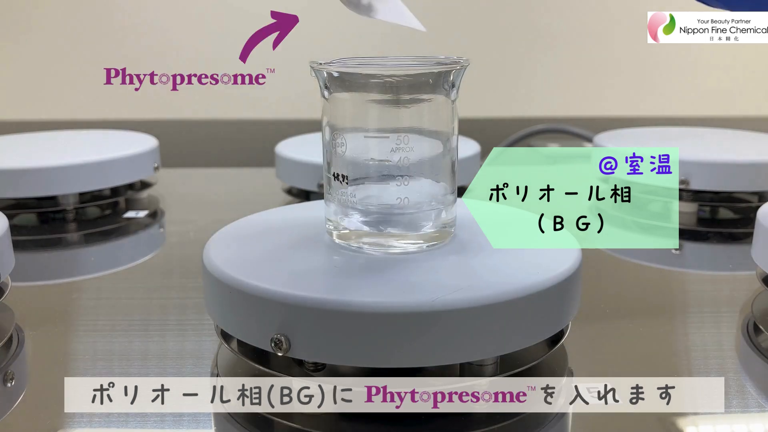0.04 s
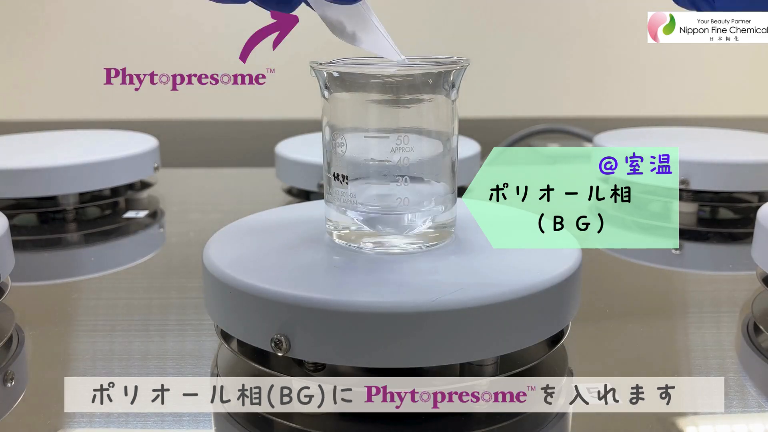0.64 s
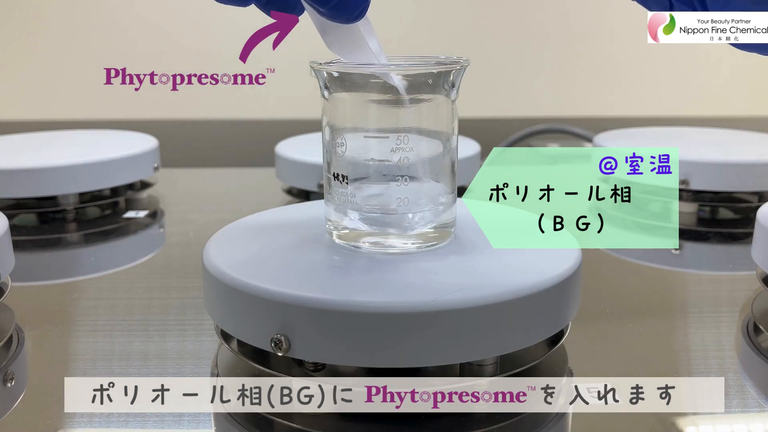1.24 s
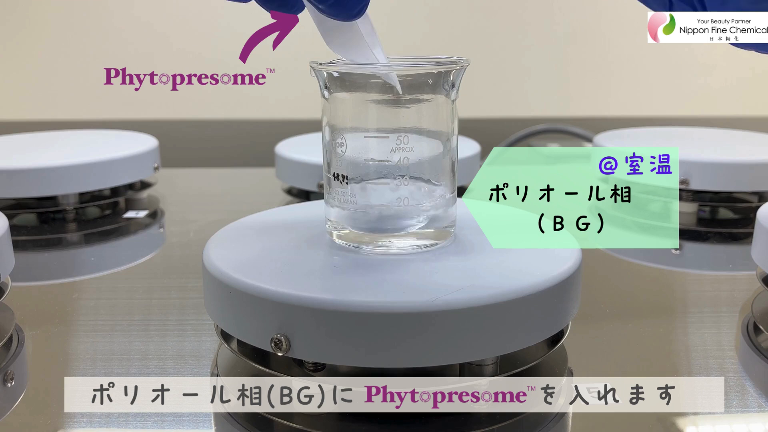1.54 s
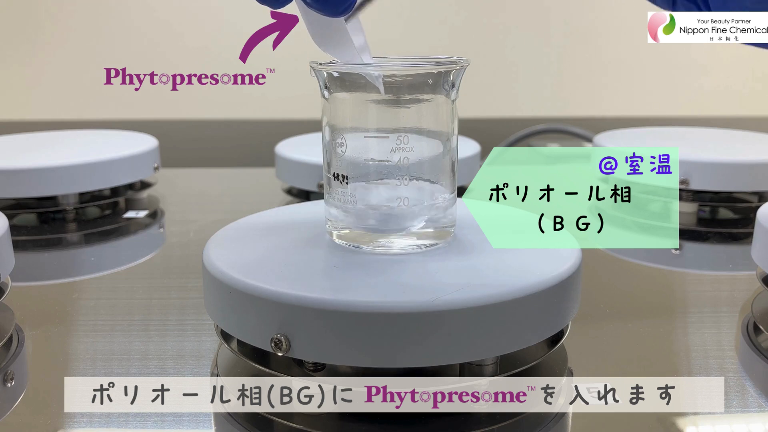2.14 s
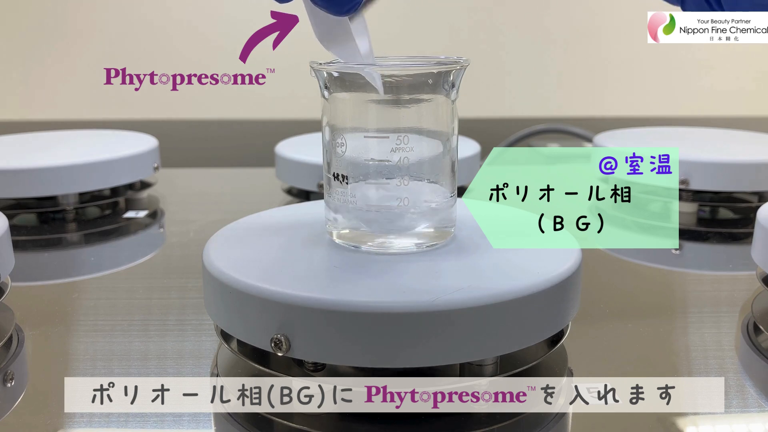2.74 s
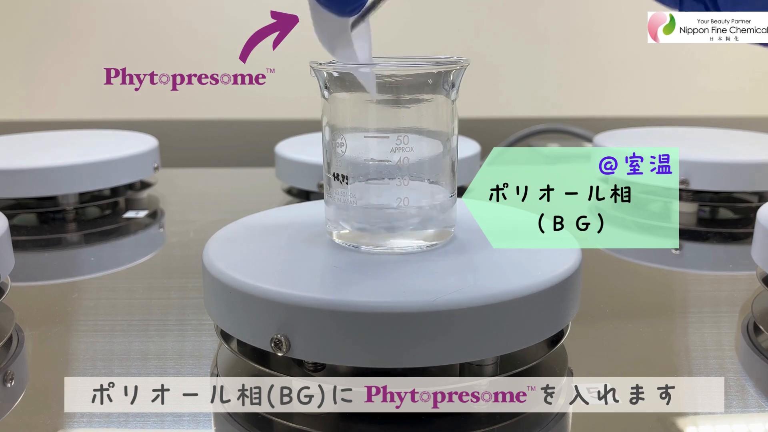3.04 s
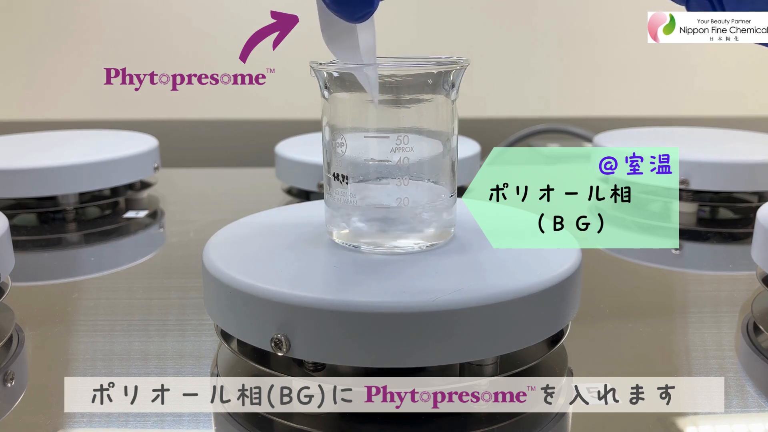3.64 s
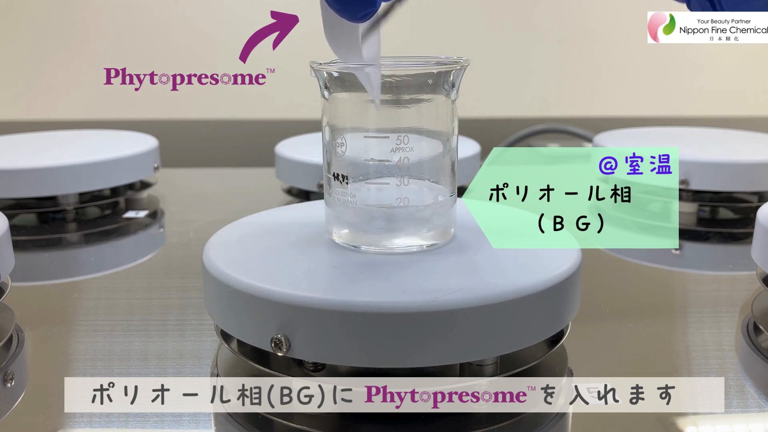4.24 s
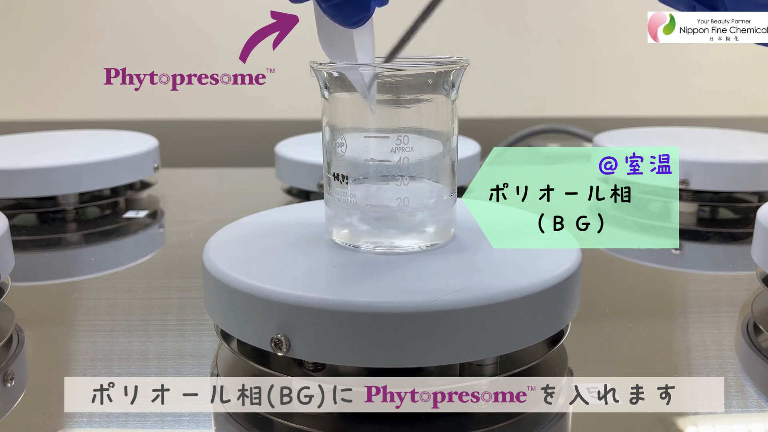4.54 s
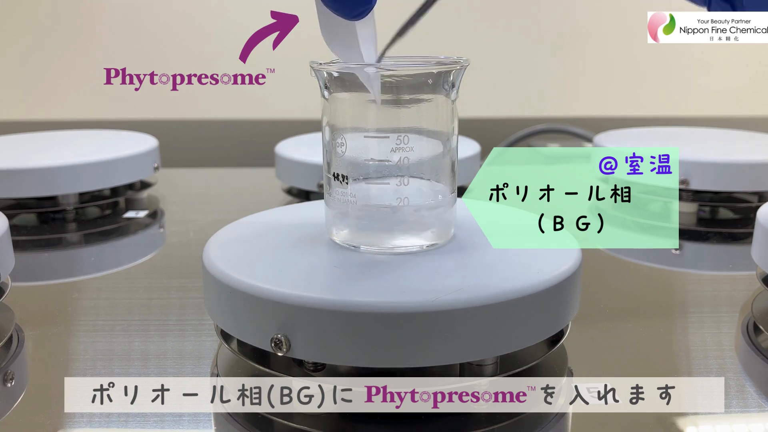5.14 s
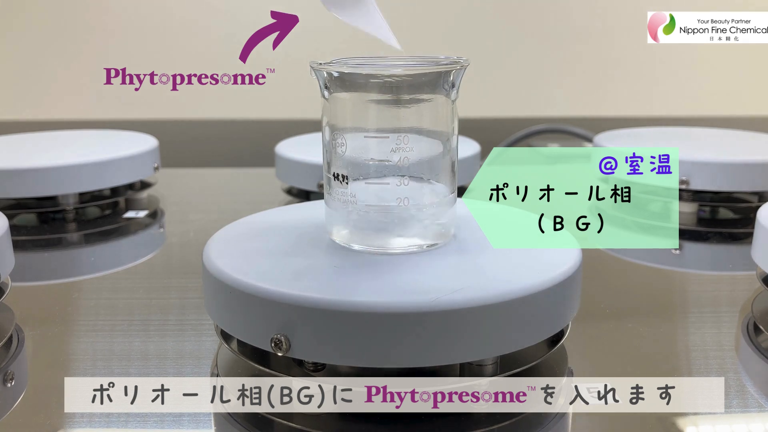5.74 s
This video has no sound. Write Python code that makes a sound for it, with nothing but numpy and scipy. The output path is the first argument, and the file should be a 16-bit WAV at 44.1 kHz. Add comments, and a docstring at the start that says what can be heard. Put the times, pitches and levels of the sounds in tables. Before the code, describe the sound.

Laboratory ventilation and motors hum low and steadily throughout. Close by and slightly to the left, a folded sheet of paper rustles and crinkles faintly, with one sharp dry click early on. From about halfway, a steel spatula lightly taps the paper several times, many taps joined by a quick, slightly squeaky scrape. Near the end the paper slides away in a soft, brightening swish with one last tap.

```python
"""Tipping powder from a folded weighing paper into a beaker, over a bed of laboratory ventilation.
First the paper rustles and crinkles as it shifts and flexes in a gloved hand; a dry click falls at 1.3 s.
From 2.8 s a steel spatula taps the sheet, knocking the stiff fold and pinging the blade. From 3.4 s it
also scrapes the paper clean in quick strokes, a friction rasp with a juddering squeak from the fold.
At 5.4 s the paper is drawn away in a brightening swish, with one last tap. Ducts and motors drone on."""
import sys
import numpy as np
from scipy import signal
from scipy.fft import rfft, irfft, next_fast_len
from scipy.io import wavfile
from scipy.ndimage import uniform_filter1d, map_coordinates

SR = 44100
rng = np.random.default_rng(int(sys.argv[2]) if len(sys.argv) > 2 else 0)


def log_audio(samples):
    """Write samples as a 16-bit WAV file to the path given in sys.argv[1]."""
    # one column per channel
    frames = np.atleast_2d(samples).T
    # limit to full scale, then quantise
    limited = np.clip(frames, -1, 1)
    pcm = np.round(limited * 32767).astype(np.int16)
    wavfile.write(sys.argv[1], SR, pcm)


N = 255780

# the paper shifts in the glove: (middle [s], length [s], rustle [dB], sheen over rustle [dB])
PAPER_MOVES = [(.01, 0.074, -80, -6), (0.257, 0.2, -79.5, -2), (0.466, 0.14, -82, 11),
               (0.65, 0.084, -72, 3.5), (.815, 0.053, -78, 3.5), (.96, 0.14, -85, 9.5),
               (1.049, 0.072, -73, 2.5), (1.14, 0.031, -74.5, -2), (1.478, 0.023, -77, -9),
               (1.54, 0.068, -75, -2), (1.757, 0.04, -80, 1.5), (1.89, 0.069, -78.5, 7),
               (2.095, 0.028, -78, -9), (2.217, 0.083, -81, 4.5), (2.402, 0.039, -78, -17),
               (2.803, 0.047, -78, 5.5), (3.08, 0.11, -76, -2), (3.338, 0.088, -81, -3),
               (3.48, 0.063, -79.5, 7), (4.15, 0.031, -82.5, 3), (4.417, 0.028, -89, 12),
               (5.306, 0.05, -76.5, 3), (5.377, 0.069, -70.5, -0.5), (5.62, .03, -78, 9),
               (5.71, .04, -75, 11)]
# the sheet flexes: (time [s], nominal length [s], level [dB])
CRINKLE_CUES = [(0.266, .008, -70), (0.486, .014, -73.5), (0.52, .012, -77), (1.543, 0.019, -61.5),
                (1.583, 0.037, -69.5), (1.847, 0.036, -66), (2.167, 0.057, -76.5), (2.467, 0.058, -73),
                (2.778, 0.0036, -60), (3.048, 0.0092, -68), (3.257, 0.021, -67.5), (3.445, 0.0085, -63.5),
                (3.701, .005, -65), (3.725, 0.015, -54), (3.996, 0.0076, -64), (4.218, 0.018, -73)]
# the spatula lands: (time [s], knock [dB], pitch [Hz], blade ping [dB])
TAP_CUES = [(2.7794, -64, 1500, -56), (3.045, -48.5, 1270, -72), (3.259, -53, 1240, -71),
            (3.7012, -49.5, 1200, -60), (3.9914, -45, 1330, -70), (4.218, -57, 1110, -70),
            (4.7294, -45, 1250, -72), (4.998, -46, 1240, -59), (5.69, -52.5, 1010, -72)]
# the spatula runs down the fold: (time [s], nominal length [s], rasp [dB], squeak middle [s],
# squeak length [s], squeak [dB], pitch [Hz], glide [Hz/s])
SCRAPE_CUES = [(3.448, 0.057, -72, 3.47, .04, -72.5, 1350, 1000),
               (3.73, 0.028, -55.5, 3.752, .014, -54, 1380, 8000),
               (3.997, 0.043, -57.5, 4.018, .03, -55.5, 1365, 3800),
               (4.24, 0.067, -75.5, 4.27, 0.038, -73.5, 1410, 2000),
               (4.503, 0.046, -58, 4.528, .036, -57, 1407, 2000),
               (4.738, 0.042, -57, 4.765, 0.03, -56, 1446, 4800),
               (5.003, 0.058, -57.5, 5.038, 0.037, -55.5, 1495, 4200)]
# modes of the steel blade: (frequency [Hz], level [dB], t60 [s])
BLADE_MODES = [(10090, -6, .03), (11000, -6, 0.032)]
# resonances of the folded sheet, and of the ducts and cabinet: (centre [Hz], half width [Hz], lift [dB])
SHEET_RESONANCES = [(2470, 190, 11), (3330, 320, 10), (4270, 190, 7.5), (5330, 230, 10), (6740, 920, 4.5),
                    (7980, 340, 5.5), (9650, 210, 9), (10700, 220, 5.5), (13000, 450, 5), (14900, 400, 9.5)]
DUCT_RESONANCES = [(75.8, 5.24, 8), (155.9, 14, 8), (177.3, 10, 8), (211, 11.5, 13.5), (283, 25, 6),
                   (341.5, 12.2, 8), (374, 16.8, 6.5), (415.4, 11, 8), (476.4, 22.2, 9), (518, 13, 4.5),
                   (599.5, 11.6, 8.5), (635, 9.6, 8.5), (672, 21, 6.5), (794.4, 21, 8.5), (864, 12, 9)]
# tone colour of each noise layer: (frequency [Hz], relative level [dB])
RUSTLE_EQ = [(500, -11), (1300, -5.5), (2400, -1.5), (3400, 2), (4100, -2), (4900, -6.5), (8000, -3),
             (11000, -37)]  # body of the sliding paper
SHEEN_EQ = [(3000, -8.5), (7000, -13), (9700, 3), (10800, 4.5), (12300, 0), (14700, 0), (16000, -12)]  # its airy top
CRINKLE_EQ = [(900, -30), (1900, -7), (4200, -25), (6000, -10.5), (8000, -5), (9800, -3), (13000, -7),
              (16000, -4)]  # flexing sheet
SCRAPE_EQ = [(900, -40), (1900, -2), (3800, -10), (5300, -5), (7800, 1), (10000, -1.5), (12000, -3.5),
             (15000, -5), (16000, -22)]  # blade rubbing on paper
CRACK_EQ = [(600, 7), (1400, 2), (2100, -3), (2900, -14), (5000, -18), (16000, -24)]  # attack of a tap
AIR_EQ = [(18.0, -17), (28.0, -23), (45.0, 0), (110.0, 0.5), (240.0, -5.5), (400.0, -13), (560.0, -19),
          (750.0, -25.5), (950.0, -30), (1300.0, -39), (2000.0, -47.5), (4500.0, -52), (16000.0, -55.5)]  # air in the ducts
HISS_EQ = [(4500, -47), (6100, -10.5), (6900, 5), (7300, -3), (8200, -8), (9500, -30), (16000, -18)]  # thin background hiss
# stereo width of the air: (frequency [Hz], side over mid [dB])
AIR_WIDTH = [(60, -21.5), (120, -13), (240, -16), (480, 0), (950, 2), (1890, 1), (3770, 0.5), (7520, 0.5),
             (15000, -66)]
# balance of the air: (frequency [Hz], left over right [dB])
AIR_PAN = [(180, -0.5), (330, -2.5), (520, 3.0), (1200, 2.5), (2500, 1.0)]
# the draught's boom swells: (middle [s], length [s], lift [dB])
BOOM_SWELLS = [(.08, 0.22, 3.5), (1.12, 0.067, 2), (1.32, 0.13, 3.5), (2.067, 0.093, 3), (2.778, 0.17, 4.5),
               (3.722, 0.13, 2.5), (4.7, 0.14, 2.5), (5.68, .08, 1.5)]
# motor tones: (frequency [Hz], left level [dB], right level [dB])
MOTOR_TONES = [(116, -77, -78), (209.6, -57, -56.5), (408.5, -71.5, -70.5), (477, -69, -72.5),
               (716, -85, -86), (841, -82, -81)]
# decay of the room: (frequency [Hz], t60 [s])
ROOM_DECAY = [(200, 0.28), (1500, 0.25), (8000, 0.17), (16000, 0.043)]

TIME = np.arange(N) / SR
SIDES = np.array([[.5], [-.5]])  # splits a stereo offset between left and right


def paper_rustle(held_db=-88, held_sheen_db=-0.5, fidget_db=0.7):
    """Paper slides in an unsteady hand: a soft rustle with a sheen on top, never quite still."""
    moves = [amp([[db], [db + sheen_db]]) * swell(middle, length)
             for middle, length, db, sheen_db in PAPER_MOVES]
    held = amp([[held_db], [held_db + held_sheen_db]])
    rustle_gain, sheen_gain = np.sqrt(sum(gain ** 2 for gain in moves + [held, pull_away()]))
    rustle = rustle_gain * friction(RUSTLE_EQ, grain_db=0.5, clump_db=-1.5, flex_db=6.0)
    sheen = sheen_gain * friction(SHEEN_EQ, grain_db=0.5, clump_db=1.5, flex_db=-2.0)
    return (rustle + amp(-4) * sheen) * amp(fidget_db * wobble(45))


def pull_away(start=5.446, onset_s=0.036, speedup_s=0.41, grow_db_per_s=24, brighten_db_per_s=50):
    """Rustle and sheen gains for the exit: louder and brighter until the hand is at full speed."""
    t = np.minimum(TIME - start, speedup_s)
    rustle = np.clip(t / onset_s + .5, 0, 1) * amp(-74.5 + grow_db_per_s * t)
    return np.array([rustle, rustle * amp(-5.5 + brighten_db_per_s * t)])


def paper_crinkles(trim_db=3):
    """Short bright bursts as the sheet flexes."""
    pressure = sum(amp(db + trim_db) * stroke(start, length * 0.69, rise=length * 1.26, fall=.006)
                   for start, length, db in CRINKLE_CUES)
    return pressure * friction(CRINKLE_EQ, grain_db=4.5, clump_db=-0.2, flex_db=9.5)


def spatula_taps(rise_s=0.0013, thud_hz=850, rebound_s=0.0075, crack_t60=0.0088, shiver_t60=0.075):
    """Each landing cracks, knocks the stiff fold and rebounds once; the blade pings, the sheet shivers."""
    tracks = np.zeros((2, N + SR))
    t = np.arange(SR // 10) / SR
    for start, db, hz, ping_db in TAP_CUES:
        knock = np.sin(2 * np.pi * hz * t) + amp(-5) * np.sin(2 * np.pi * thud_hz * t)
        knock *= (t / rise_s * np.exp(1 - t / rise_s)) ** 2
        knock += amp(-13) * np.interp(t - rebound_s, t, knock)
        ping = sum(amp(ping_db + level - 60 * t / t60) * np.sin(2 * np.pi * mode_hz * t)
                   for mode_hz, level, t60 in BLADE_MODES)
        crack = amp(-9 - 60 * t / crack_t60)
        shiver = amp(-31 - 60 * t / shiver_t60)
        at = round(start * SR)
        tracks[:, at:at + len(t)] += [amp(db) * knock + ping, amp(db) * (crack + shiver)]
    tones, noise_gain = tracks[:, :N]
    return tones + noise_gain * unit_rms(equalise(rng.standard_normal(N), CRACK_EQ))


def spatula_scrapes(trim_db=2, easing_db=6, bite_s=0.031, lift_off_s=0.012, judder_db=3, scatter_rad=.95):
    """A rasp that bites then eases, and the fold's juddering squeak; both rise as the blade slides."""
    rasp, squeak = np.zeros((2, N))
    grit = friction(SCRAPE_EQ, grain_db=2.4, clump_db=0.5, flex_db=4.5)
    for start, length, rasp_db, middle, squeak_s, squeak_db, hz, glide in SCRAPE_CUES:
        glide_hz = glide * np.clip(TIME - middle, -squeak_s, squeak_s / 2)
        rising = np.exp(2j * np.pi * np.cumsum(glide_hz) / SR)  # frequency shifter
        bend = 1 + 0.015 * rng.uniform(-0.9, 1)  # each stroke bends the sheet and retunes it
        sheet = unit_rms(filtered(grit, lambda f: amp(resonance_db(SHEET_RESONANCES, f / bend))))
        travel = np.clip((TIME - start) / length, 0, .8) - .5
        pressure = stroke(start + 0.0025, length * 0.74, bite_s, lift_off_s)
        rasp_gain = amp(rasp_db + trim_db - easing_db * travel) * pressure
        rasp += rasp_gain * np.real(signal.hilbert(sheet) * rising)

        judder = unit_rms(amp(judder_db * wobble(450))) * np.exp(1j * scatter_rad * wobble(330))
        tone = np.real(judder * rising * np.exp(2j * np.pi * hz * TIME))
        contact = stroke(start, length + .003, rise=.01, fall=.003)
        squeak += amp(squeak_db + trim_db) * swell(middle, squeak_s) * contact * tone
    return rasp, squeak


def friction(eq, grain_db, clump_db, flex_db):
    """Coloured noise of rms 1, made gritty by fibres that catch and let go in clumps."""
    grit = rng.standard_normal(N) * amp(grain_db * wobble(2500) + clump_db * wobble(220))
    return unit_rms(equalise(flexing(grit, flex_db), eq))


def flexing(x, depth_db):
    """As the sheet bends, small resonances come and go within a few hundredths of a second."""
    spectrum = signal.stft(x, nperseg=256)[2]
    patches = uniform_filter1d(rng.standard_normal(spectrum.shape), size=2, axis=0)  # across frequency
    patches = uniform_filter1d(patches, size=7, axis=1)  # across time
    gain = amp(depth_db * np.minimum(unit_rms(patches), 1))
    return unit_rms(signal.istft(spectrum * gain, nperseg=256)[1][:N])


def dry_click(time_s=1.3216, decay_s=0.006, knock_hz=230, knock_t60=0.034):
    """One dry click, dead centre, with a short low knock under it."""
    t = TIME - time_s
    after = np.maximum(t, 0)
    snap = amp(-33) * np.sign(t) * np.exp(-np.abs(t) / decay_s) / 2
    knock = amp(-39 - 60 * after / knock_t60) * np.sin(2 * np.pi * knock_hz * after)
    return snap + knock


def room_reverb(x):
    """A short stereo tail whose top end dies first."""
    hz, t, spectrum = signal.stft(rng.standard_normal((2, SR // 2)), SR, nperseg=256)
    decay = amp(-60 * t / curve(ROOM_DECAY, hz)[:, None])
    tail = signal.istft(spectrum * decay, SR, nperseg=256)[1]
    return signal.fftconvolve(x[None], tail / np.linalg.norm(tail[0]), axes=1)[:, :N]


def ventilation(draught_db=-44, boom_hz=185):
    """Turbulent air booms in the duct resonances; the bass sits centred and swells now and then."""
    colour = lambda hz: amp(curve(AIR_EQ, hz) + resonance_db(DUCT_RESONANCES, hz))
    mid = filtered(rng.standard_normal(N), colour)
    side = filtered(rng.standard_normal(N), lambda hz: colour(hz) * amp(curve(AIR_WIDTH, hz)))
    air = np.array([mid + side, mid - side])
    air = unit_rms(filtered(air, lambda hz: amp(curve(AIR_PAN, hz) * SIDES)))
    boom = filtered(air, lambda hz: 1 / (1 + (hz / boom_hz) ** 10))
    surge = amp(sum(db * swell(middle, length) for middle, length, db in BOOM_SWELLS))
    return amp(draught_db) * (air + (surge - 1) * boom)


def motor_hum(waver_db=3.5, drift_hz=1.194):
    """The motors drone, wavering in level and drifting slightly in pitch."""
    hum = np.zeros((2, N))
    for hz, left_db, right_db in MOTOR_TONES:
        rms = amp(np.array([[left_db], [right_db]]) + waver_db * wobble(2.946))
        cycles = np.cumsum(hz + drift_hz * wobble(5)) / SR + rng.uniform()
        hum += rms * np.sqrt(2) * np.sin(2 * np.pi * cycles)
    return hum


def thin_hiss(level_db=-77.5, side_db=-7):
    """A faint, narrow hiss high above the hum."""
    mid, side = equalise(rng.standard_normal((2, N)), HISS_EQ)
    side *= amp(side_db)
    return amp(level_db) * unit_rms(np.array([mid + side, mid - side]))


def stroke(start, length, rise, fall):
    """Contact pressure: builds up, holds, and dies away after the stroke."""
    t = TIME - start
    return np.clip(t / rise + .5, 0, 1) * np.exp(-np.clip((t - length) / fall, 0, 40))


def swell(middle, length, skew=0.081):
    """A smooth fade in and a slightly slower fade out, 1 at the top."""
    u = (TIME - middle) / length
    return np.exp(-2 * (u / (1 + skew * np.sign(u))) ** 2)


def wobble(rate):
    """Smooth random modulation, rate knots a second."""
    return map_coordinates(rng.standard_normal(int(N * rate / SR) + 4), [TIME * rate])


def resonance_db(resonances, hz):
    """The boost from a set of bell-shaped peaks."""
    return sum(db * np.exp(-((hz - centre) / width) ** 2) for centre, width, db in resonances)


def curve(points, hz):
    """Joins (frequency, value) points on a log frequency axis."""
    knots_hz, values = np.transpose(points)
    return np.interp(np.log(hz + 1), np.log(knots_hz + 1), values)


def equalise(x, eq):
    """Colours x with an EQ table."""
    return filtered(x, lambda hz: amp(curve(eq, hz)))


def filtered(x, response):
    """Runs x through a complex frequency response."""
    size = next_fast_len(N + SR // 2)
    return irfft(rfft(x, size) * response(np.fft.rfftfreq(size, 1 / SR)), size)[..., :N]


def amp(db):
    return 10 ** (np.asarray(db) / 20)


def unit_rms(x):
    return x / np.sqrt(np.mean(x ** 2) + 1e-20)


def scene(left_lead_s=0.00014, centred_hz=3500, fold_left_db=7, reverb_db=-7.5, fold_send_db=-6.5):
    """The paper is close and a little to the left, its treble near the centre; the air fills the room."""
    rasp, squeak = spatula_scrapes()
    bright = paper_rustle() + paper_crinkles() + rasp
    fold = squeak + spatula_taps()
    delay_pan = lambda hz: np.exp(2j * np.pi * hz * left_lead_s * SIDES / (1 + (hz / centred_hz) ** 2))
    close = filtered(bright, delay_pan) + fold * amp(fold_left_db * SIDES)
    reverb = amp(reverb_db) * room_reverb(bright + amp(fold_send_db) * fold)
    return close + reverb + dry_click() + ventilation() + motor_hum() + thin_hiss()


def record(dry):
    """A brick-wall high cut at 15.8 kHz on the whole mix."""
    return filtered(dry, lambda hz: hz < 15800)


dry = scene()
out = record(dry)
log_audio(out)
```